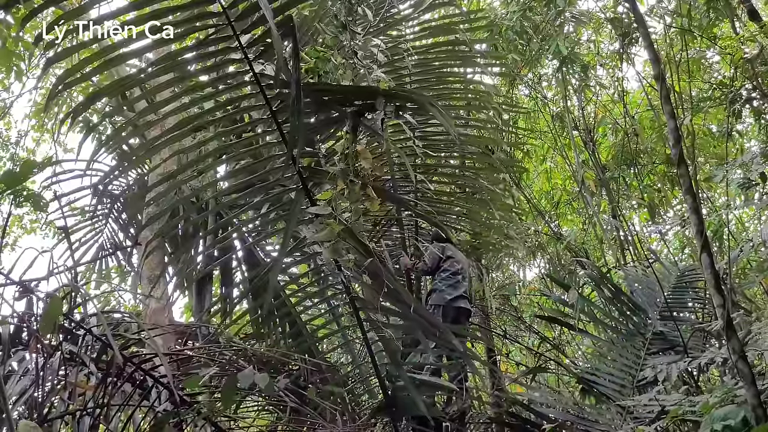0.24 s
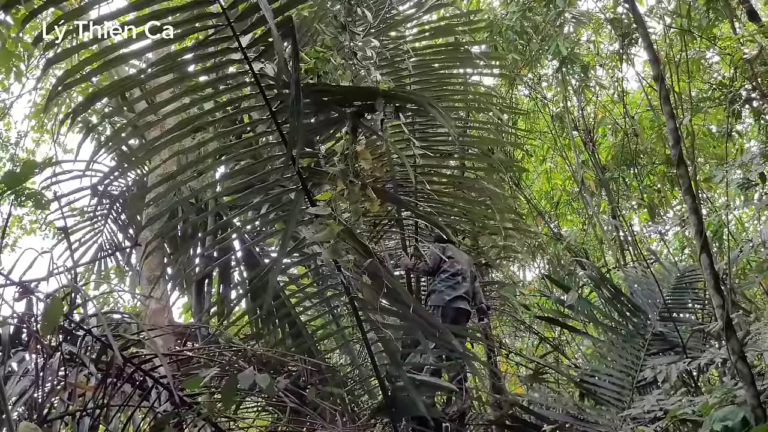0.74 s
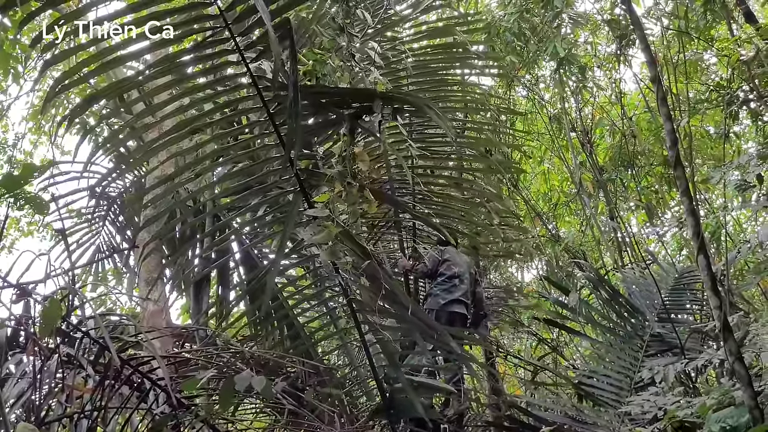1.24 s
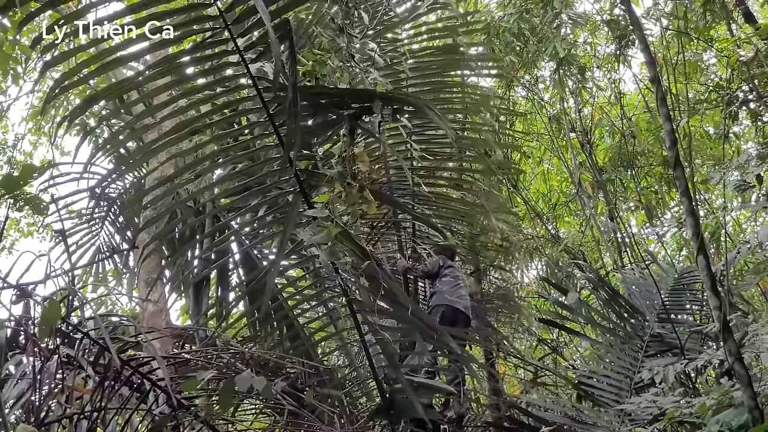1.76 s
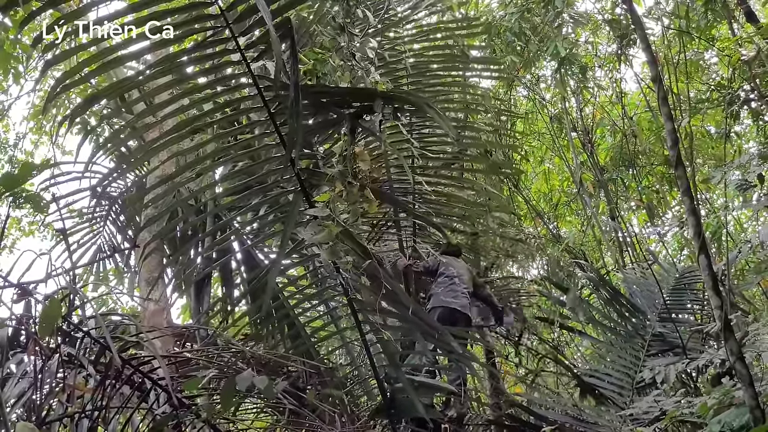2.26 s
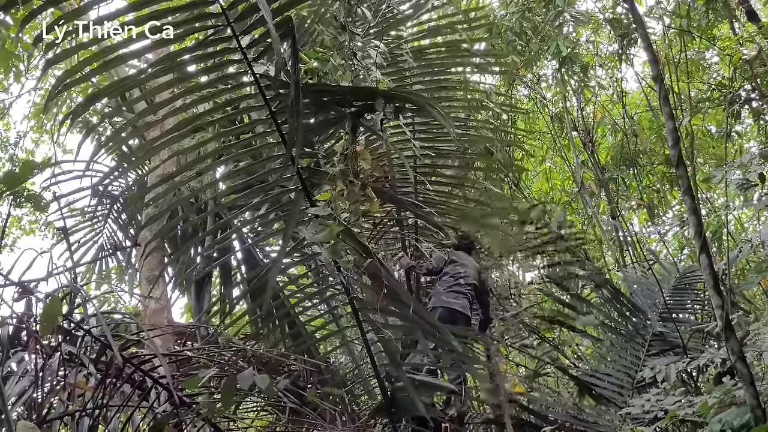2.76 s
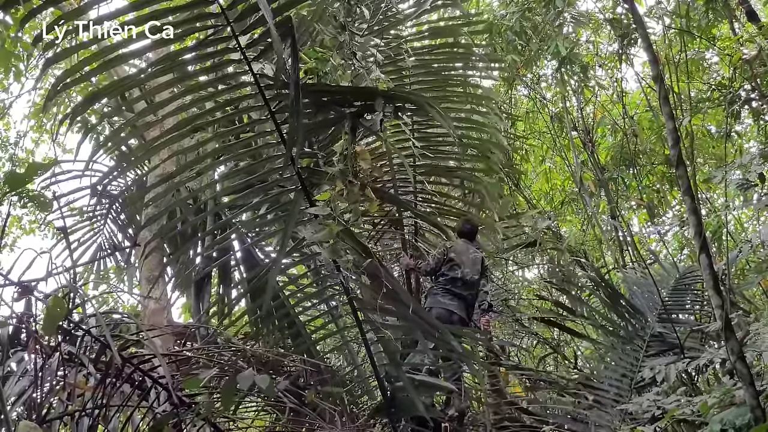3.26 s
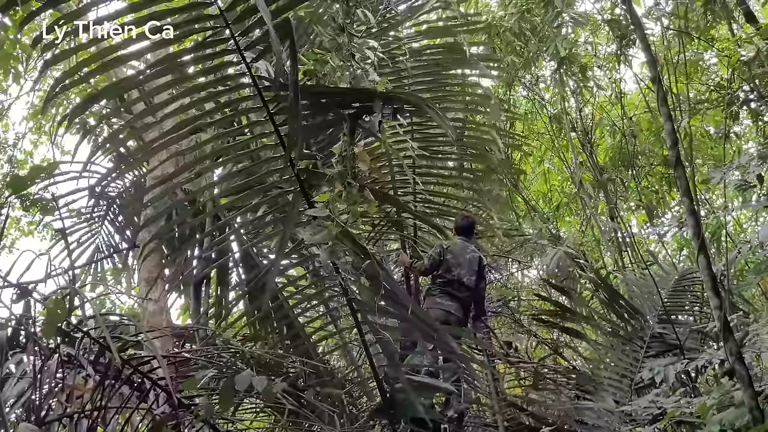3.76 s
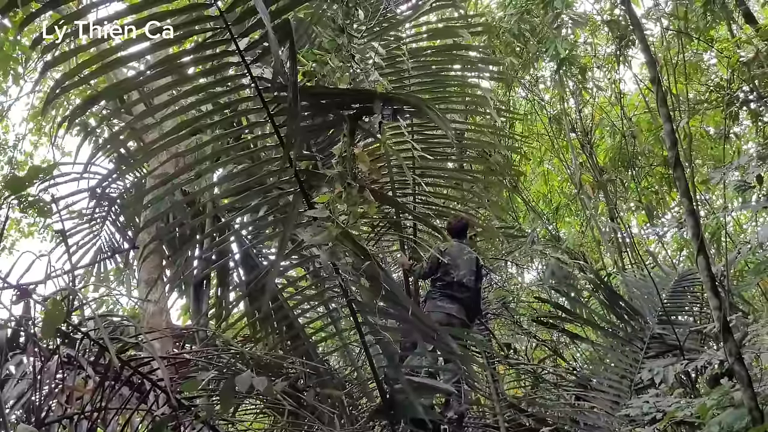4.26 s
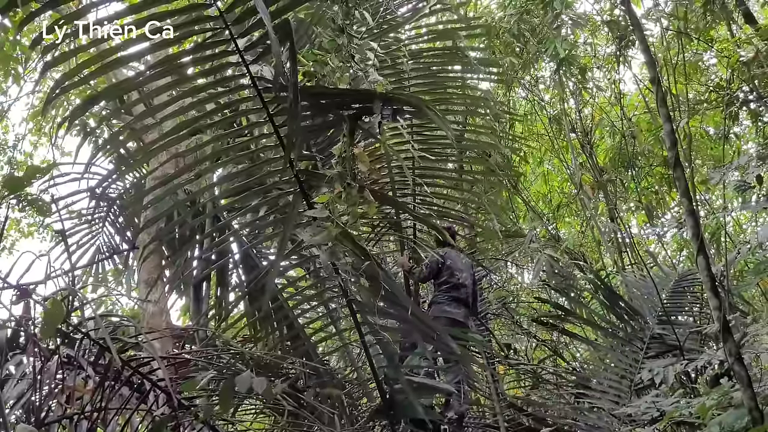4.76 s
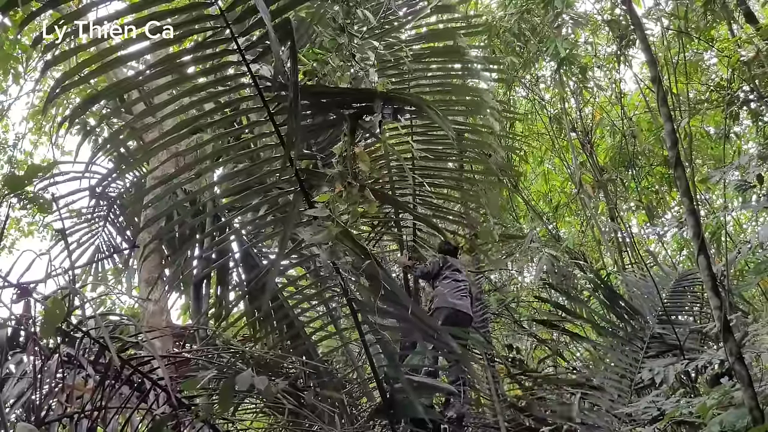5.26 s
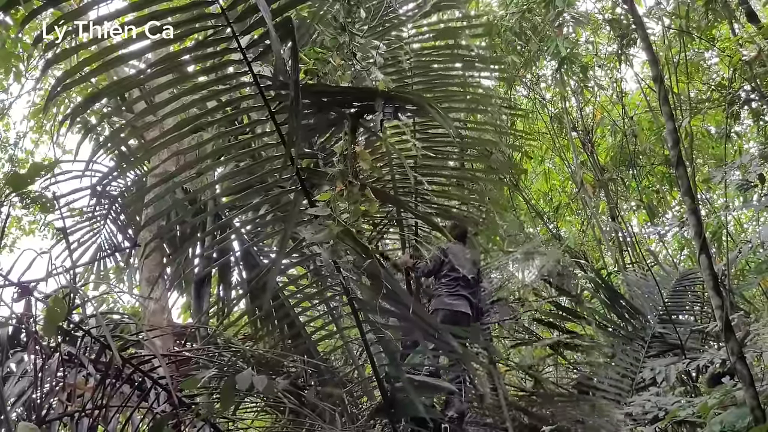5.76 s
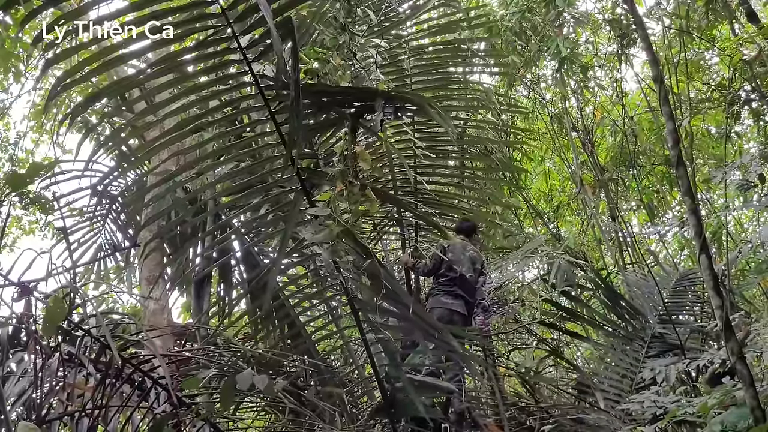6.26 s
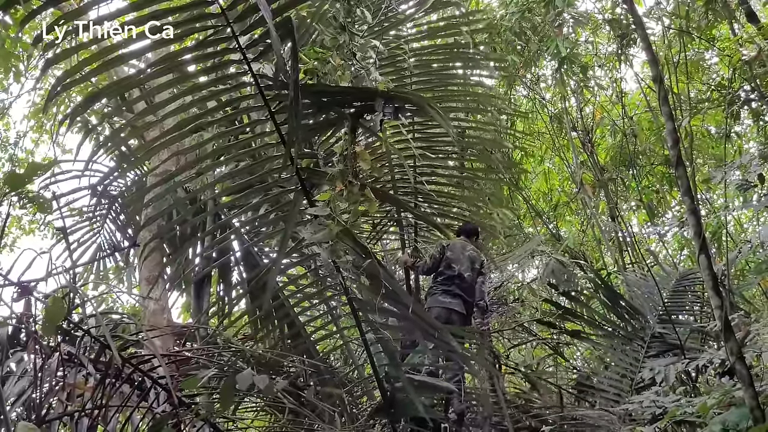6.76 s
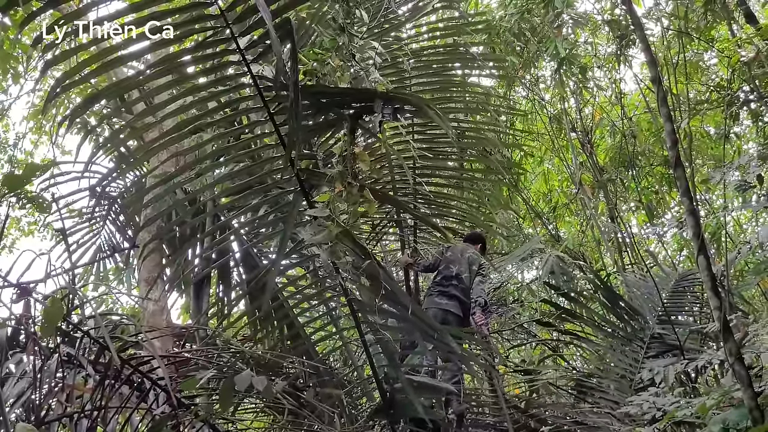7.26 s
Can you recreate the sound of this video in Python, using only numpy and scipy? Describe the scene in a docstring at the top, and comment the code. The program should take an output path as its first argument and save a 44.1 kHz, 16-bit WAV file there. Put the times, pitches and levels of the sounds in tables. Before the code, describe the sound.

A steady, fluttering insect hiss around 8-9 kHz, with fainter lower bands, runs throughout; a nearer call climbs and breaks off at about 0, 1.15, 2.85, 5.0 and 7.5 s. Leaves rustle at the start, a stalk snaps and knocks at 0.2 s, then faint scraping and small knocks follow. The first machete chop lands at 1.56 s, with a leafy shake. A tiny bird-like chirp at 2.2 s precedes a bright crack at 2.7. Firm crunchy blows hit at 2.8, 3.5, 4.2, 4.9 and 5.55 s; a very faint squeak comes near 4.0. Snaps and woody knocks crowd 5.2-6.3 s amid tugging rustle. Softer blows fall at 6.4 and 7.4 s. Blows are dry, hollow and low-mid, with short tearing fibres, little bass and diffuse forest echoes under half a second, heard slightly right in stereo.

```python
"""Insects hiss high up while stalks rustle and snap; then a man's machete blows cut fronds off a palm.
Each blow drives the damped modes of a stalk, with shaped noise for torn fibres and shaken leaflets.
Snaps are short noise bursts, knocks and bumps are struck modes, and pulls are swelling noise.
The insects are narrow bands of noise. A dense forest scatters the blows, snaps, knocks and gliding
tones through a decaying echo of noise."""
import sys
import numpy as np
from scipy import signal
from scipy.fft import rfft, irfft, next_fast_len
from scipy.io import wavfile
from scipy.ndimage import uniform_filter1d

SR = 44100
rng = np.random.default_rng(int(sys.argv[2]) if len(sys.argv) > 2 else 0)


def file_out(sig):
    """Save sig as 16-bit WAV at sys.argv[1]."""
    # one column per channel
    cols = np.atleast_2d(sig).T
    # limit, then scale
    lim = np.clip(cols, -1, 1)
    pcm = np.round(lim * 32767).astype(np.int16)
    wavfile.write(sys.argv[1], SR, pcm)


N = 331165
TIME = np.arange(N) / SR
HIT = TIME[:SR // 2]   # half a second, the clock of one short event

# Spectrum of tearing stalk fibres. Each row: frequency in Hz, relative spectral level in dB.
CRUNCH_SPECTRUM = [(150, -29), (400, 1), (700, -6), (950, -3), (1450, -4), (2100, -5.5), (3000, -9),
                   (5000, -7.5), (9000, -17), (16000, -15.5)]
# Unevenness of fibre clicks: spread between clicks in dB, spread between clumps in dB.
FIBRE_UNEVENNESS = (4.0, 2.0)
# Unevenness of leaf clicks and leaf echoes: spread between clicks in dB, spread between clumps in dB.
LEAF_UNEVENNESS = (3.5, 1.2)


def from_db(db):
    """A level in decibels is 20 times the base-10 logarithm of the amplitude gain returned here."""
    return 10 ** (np.asarray(db) / 20)


def rms_one(x):
    """Dividing by the root mean square gives a signal unit power."""
    return x / np.sqrt(np.mean(x ** 2) + 1e-20)


def at_hz(points, hz):
    """Columns against frequency are interpolated along a logarithmic axis, as pitch is heard."""
    f, *columns = np.transpose(points)
    return [np.interp(np.log(hz + 1), np.log(f), column) for column in columns]


def add(out, s, sound):
    """Superposition: a sound starting at s seconds sums with what is already there."""
    i = max(round(s * SR), 0)
    out[:, i:i + sound.shape[-1]] += sound[..., :N - i]


def colour(pair, spectrum):
    """Mid-side mixing of two independent signals sets their left-right correlation by frequency; rms 1."""
    # Each row: frequency in Hz, left-right correlation without unit.
    likeness = [(50, 0.85), (130, 0.91), (300, 0.91), (600, 0.88), (1100, 0.63), (2200, 0), (16000, 0.036)]
    length = pair.shape[1]
    size = next_fast_len(length)
    hz = np.arange(size // 2 + 1) * SR / size
    mid, side = rfft(pair, size) * from_db(at_hz(spectrum, hz)[0])
    alike = np.clip(at_hz(likeness, hz)[0], -1, 1)
    stereo = np.sqrt(1 + alike) * mid + np.sqrt(1 - alike) * side * [[1], [-1]]
    return rms_one(irfft(stereo, size)[:, :length])


def drift(rate, size):
    """Slow modulation: random knots of unit spread, rate per second, are joined by straight lines."""
    knots = rng.standard_normal(size)
    return np.interp(np.arange(size) * rate / SR, np.arange(size), knots)


def crackle(spectrum, size, grain_db, clump_db):
    """Countless clicks sum to noise, whose level fluctuates between clicks and between clumps; rms 1."""
    unevenness_db = grain_db * drift(3000, size) + clump_db * drift(250, size)
    clicks = rng.standard_normal((2, size)) * from_db(unevenness_db)
    return colour(clicks, spectrum)


def burst(rise, t60):
    """Energy builds up to gain 1 in rise seconds, then decays exponentially by 60 dB in t60 seconds."""
    growth = np.minimum(HIT / rise, 1) ** 2
    return growth * from_db(-60 * np.maximum(HIT - rise, 0) / t60)


def swell(s, rise, fall):
    """Exponential growth to gain 1 at s seconds, then decay, each at its own rate in dB per second."""
    return from_db(np.minimum((TIME - s) * rise, (s - TIME) * fall))


def ring(force, hz, t60):
    """A driven damped oscillator: one mode, a pair of complex poles, rings after each force on it."""
    r, w = from_db(-60 / (t60 * SR)), 2 * np.pi * hz / SR
    return signal.lfilter([0, np.sin(w)], [1, -2 * r * np.cos(w), r * r], force + 1e-18)


def resonance(x, hz, width_hz):
    """A resonator passes the band around its own frequency, with gain 1 at the peak."""
    r = np.exp(-np.pi * width_hz / SR)
    feedback = [1, -2 * r * np.cos(2 * np.pi * hz / SR), r * r]
    return signal.lfilter(np.array([1, 0, -1]) * (1 - r * r) / 2, feedback, x)


def buzz(hz, width_hz):
    """Many incoherent callers sum to narrow-band noise: a random envelope on a carrier; rms 1."""
    r = np.exp(-np.pi * 1.5 * width_hz / SR)   # two poles in series narrow the band; 1.5 makes up for it
    noise = rng.standard_normal((2, N)) + 1j * rng.standard_normal((2, N))
    flutter = signal.lfilter([1], [1, -2 * r, r * r], noise)
    carrier = np.exp(2j * np.pi * np.cumsum(hz * np.ones(N)) / SR)
    return rms_one((flutter * carrier).real)


def chops(crunch_db=3, shake_db=-2, trunk_db=-45.0, trunk_hz=58, touch=0.43, slip=0.028,
          split=0.63, split_width_hz=300, crunch_t60=0.076, shake_rise=0.0023, shake_t60=0.41):
    """Impact excitation: touch, bite and rough slip drive the stalk; fibres, leaflets and trunk respond."""
    # Blade blows. Each row: start in seconds, thud level in dB, frequency in Hz that the struck spot
    # favours (before tuning), stalk tuning ratio, crunch level in dB before crunch_db, split resonance in Hz,
    # leaflet shake level in dB before shake_db, decay time of the rough force in seconds per 60 dB.
    blows = [(1.562, -26, 224, 0.97, -26, 1160, -26, 0.17),
             (2.793, -21.5, 327, 1.0, -23.5, 1910, -32.5, 0.094),
             (3.490, -22, 325, 1.05, -24, 1170, -32.5, 0.068),
             (4.190, -23.5, 300, 1.065, -24.5, 1370, -27, 0.1),
             (4.885, -23, 378, 1.09, -26.5, 1580, -27, 0.063),
             (5.548, -20, 270, 1.108, -24, 1440, -31, 0.071),
             (6.393, -28, 297, 0.92, -25.5, 1230, -29.5, 0.12),
             (7.374, -30, 384, 1.07, -31, 940, -29.5, 0.4)]
    # Spectra of leaflets and trunk. Each row: frequency in Hz, relative spectral level in dB.
    leaflet_spectrum = [(400, 10), (1200, -2), (2500, 7), (3600, 0), (5200, 5.5), (6800, -3), (8500, 1.5),
                        (12000, -4), (16000, -22)]
    trunk_spectrum = [(20, -24), (40, -8), (58, 1), (85, -11), (140, -4), (250, -3), (600, -40),
                      (2000, -70)]
    bite_s = 0.00653   # from the blade's first touch to its full bite
    out = np.zeros((2, N))
    for s, thud, favoured_hz, tuning, crunch, split_hz, shake, shudder in blows:
        force = slip * rng.standard_normal(len(HIT)) * burst(bite_s, shudder)
        force[0] += touch
        force[round(bite_s * SR)] += 1
        body = from_db(thud) * stalk(force, favoured_hz, tuning)

        boom = np.sin(2 * np.pi * trunk_hz * HIT) * burst(0.048, 0.15)
        rumble = crackle(trunk_spectrum, len(HIT), 0, 0)[0] * burst(0.041, 0.19)
        trunk = from_db(trunk_db) * (boom + rumble)

        fibres = crackle(CRUNCH_SPECTRUM, len(HIT), *FIBRE_UNEVENNESS)
        fibres = rms_one(fibres + split * resonance(fibres, split_hz, split_width_hz))   # opening split rings
        fibres = from_db(crunch + crunch_db) * fibres * burst(bite_s, crunch_t60)

        leaves = crackle(leaflet_spectrum, len(HIT), *LEAF_UNEVENNESS) * burst(shake_rise, shake_t60)
        leaves = from_db(shake + shake_db) * leaves
        add(out, s, body + trunk + fibres + leaves)
    return out


def stalk(force, favoured_hz, tuning, spread=0.83, far_db=-7):
    """Modal superposition: the struck spot favours modes near one pitch; rms 1 over the loudest 10 ms."""
    # Modes of a frond stalk. Each row: frequency in Hz before tuning, level in dB before the weighting
    # by struck spot and a random change, decay time in seconds per 60 dB.
    modes = [(144.4, -8.5, 0.062), (237.5, -0.5, 0.086), (290.6, 1, 0.035), (381, 0.5, 0.045),
             (497, -4.5, 0.044), (553, -1, 0.024), (681, -1, 0.032), (895, -4, 0.056), (1280, 2.5, 0.0099),
             (1440, -1, 0.022)]
    body = 0
    for k, (hz, db, t60) in enumerate(modes):
        octaves = np.log2(hz / favoured_hz)
        away = 1 - np.exp(-(octaves / spread) ** 2)
        gain = from_db(db + far_db * away + rng.normal())
        body = body + ring(force, hz * tuning, t60) * gain * (-1) ** k   # neighbours in opposite phase
    return body / np.sqrt(uniform_filter1d(body ** 2, size=SR // 100).max())


def snaps(woody_db=-2, splinter_db=-1, fine_db=-1):
    """Sudden fracture: a bundle of fibres gives way in milliseconds, then the last strands crackle out."""
    # Snapping bundles. Each row: start in seconds, overall level in dB, then levels in dB relative to it,
    # before the function's own offsets, of the woody, splinter and fine treble parts, and
    # decay time in seconds per 60 dB.
    bundles = [(.206, -30.5, -2, -0.5, -0.5, 0.066), (.448, -42.5, -6, 0.5, 0, 0.13),
               (2.155, -43.5, -24, -20, 8.5, 0.065), (2.623, -34.5, -17, -2, 3, 0.094),
               (2.706, -20, -22, -6, 4, .062), (3.218, -33, -3, 1, 3, 0.093),
               (4.022, -42.5, -1.5, -5, 2.5, 0.14), (5.176, -31.5, 4, -20, -12, 0.064),
               (5.229, -34.5, -.5, 3, -1.5, 0.07), (5.395, -29, -3.5, -0.5, 1.5, 0.048),
               (5.459, -27.5, 3.5, 5, -5.5, 0.097), (5.811, -28.5, 2.5, -6.5, -5, 0.025),
               (6.333, -33.5, 3.5, -12, -23, 0.15)]
    # Spectra of splinters and fine strands. Each row: frequency in Hz, relative spectral level in dB.
    splinter_spectrum = [(600, -58), (1800, 0), (3200, -3.5), (4500, 2.5), (5400, 3), (6800, -15),
                         (9000, -15), (16000, -25)]
    fine_spectrum = [(3000, -22), (5500, -3), (7500, -6.5), (10000, -6), (12500, -3), (16000, -8)]
    out = np.zeros((2, N))
    for s, db, woody, splinter, fine, t60 in bundles:
        parts = [(CRUNCH_SPECTRUM, woody + woody_db),
                 (splinter_spectrum, splinter + splinter_db),
                 (fine_spectrum, fine + fine_db)]
        crack = 0
        for spectrum, part_db in parts:
            crack = crack + from_db(db + part_db) * crackle(spectrum, len(HIT), *FIBRE_UNEVENNESS)
        add(out, s, crack * burst(0.0034, t60))
    return out


def knocks(level_db=-3):
    """Impulsive contact: a light blow and a little roughness make the stalk's modes ring."""
    # Knocks of stalk on stalk. Each row: start in seconds, level in dB before level_db,
    # frequency in Hz that the contact favours (before tuning).
    contacts = [(.206, -32, 570), (.813, -48, 340), (1.084, -39, 590), (1.295, -42.5, 700),
                (3.044, -43, 280), (5.176, -27.5, 674), (5.177, -30, 339), (5.397, -33.5, 725),
                (5.627, -28.5, 448), (5.881, -37, 494), (6.115, -35.5, 696), (6.199, -35.5, 530),
                (6.265, -38.5, 645), (6.334, -31, 313), (6.707, -43.5, 380)]
    out = np.zeros((2, N))
    for s, db, favoured_hz in contacts:
        force = 0.066 * rng.standard_normal(len(HIT)) * burst(0.0015, 0.033)
        force[0] += 1
        add(out, s, from_db(db + level_db) * stalk(force, favoured_hz, 0.95, spread=0.29, far_db=-15.5))
    return out


def dragging(rustle_db=2, bump_db=-8):
    """Friction noise: stalks scrape and bump, and dry leaflets brush past, catching and letting go."""
    # Spectra of scraping stalks and rustling leaves. Each row: frequency in Hz, relative spectral level in dB.
    scrape_spectrum = [(30, -41), (100, -8.5), (180, -13), (280, 3.5), (500, 0.5), (900, -1), (1400, 0.5),
                       (2200, -1.5), (4000, -12.5), (9000, -47)]
    rustle_spectrum = [(500, -17), (1800, -6), (3000, -3), (3900, -3.5), (5000, 1), (6300, -8), (8000, 1),
                       (11000, -6.5), (13000, -6.5), (16000, -16.5)]
    scrape, rustle = pulling()
    catching_db = 1.1 * drift(55, N)
    low = scrape * from_db(catching_db) * crackle(scrape_spectrum, N, *FIBRE_UNEVENNESS)
    high = crackle(rustle_spectrum, N, grain_db=0.0, clump_db=0.2)
    high = rustle * from_db(rustle_db + 0.5 * catching_db) * high
    return low + high + scrape * from_db(bump_db) * bumps()


def pulling(range_db=20):
    """Incoherent sources add in power: each pull's scrape and rustle gains rise above stirring foliage."""
    # Pulls on a frond. Each row: time of the hardest tug in seconds, stalk scrape level in dB,
    # leaf rustle level in dB before the rustle offset, build-up in seconds, letting-go in seconds
    # (each the time for a change of range_db).
    tugs = [(.01, -44, -36.5, 0.22, 0.22), (.5, -54, -47.5, 1.4, 1.4), (1.18, -42, -46.5, 0.31, 0.43),
            (2.22, -49.5, -42.5, 0.1, 0.59), (2.68, -46.5, -39.5, 1.02, 1.13),
            (3.1, -47.5, -54, 0.36, 0.58), (4.0, -52.5, -49.5, 1.0, 0.32), (4.55, -60.5, -50.5, 0.92, .8),
            (4.95, -44, -41.5, .15, 0.3), (5.57, -44, -37.5, 0.79, 0.3), (6.3, -43.5, -40.5, 1.4, 0.51),
            (7.5, -48.5, -39, .7, 0.17)]
    scrape, rustle = from_db(-61), from_db(-49.5)   # the foliage never quite stops stirring
    for s, scrape_db, rustle_db, build, release in tugs:
        effort = swell(s, range_db / build, range_db / release)
        scrape = np.hypot(scrape, from_db(scrape_db) * effort)
        rustle = np.hypot(rustle, from_db(rustle_db) * effort)
    return scrape, rustle


def bumps(per_s=45, low_hz=450, high_hz=1100, count=4):
    """Random impacts, a Poisson-like train, ring a few spots that each favour another pitch; rms 1."""
    out = 0
    for favoured_hz in np.geomspace(low_hz, high_hz, count):
        struck = rng.random(N) < per_s / count / SR
        force = struck * rng.uniform(0.6, 1, N)
        out = out + stalk(force, favoured_hz, 0.94, spread=0.31, far_db=-20)
    return rms_one(out)


def glides():
    """Frequency glide: narrow-band tones, a far bird and a squeaking stalk, swell, slide and fade."""
    # Each row: start in seconds, length in seconds, level in dB, start frequency in Hz,
    # end frequency in Hz, bandwidth in Hz.
    tones = [(2.213, 0.092, -46, 7520, 6980, 340), (3.965, .125, -53, 511, 699, 9)]
    out = 0
    for s, length, db, start_hz, end_hz, width_hz in tones:
        phase = np.clip((TIME - s) / length, 0, 1)
        hz = start_hz + (end_hz - start_hz) * phase
        out = out + from_db(db) * np.sin(np.pi * phase) * buzz(hz, width_hz)
    return out


def caller(start_hz=8120, top_hz=9920, climb_s=0.32, width_hz=850):
    """Joint amplitude and frequency modulation: a near insect's call swells, climbs and breaks off."""
    # Calls. Each row: time of the climax in seconds, level in dB.
    calls = [(0.019, -35), (1.15, -48.5), (2.85, -37.5), (5.02, -35), (7.51, -34.5)]
    # rise and fall in dB per second
    gains = np.array([from_db(db) * swell(s, 36, 149.5) for s, db in calls])
    climax = np.array(calls)[gains.argmax(axis=0), 0]   # of the call that is strongest at each moment
    climb = np.exp(np.minimum(TIME - climax, 0) / climb_s)   # ever faster towards the climax
    return gains.max(axis=0) * buzz(start_hz + (top_hz - start_hz) * climb, width_hz)


def insects(throb_hz=34, throb_depth=0.28):
    """Amplitude modulation: a chorus throbs together as its bands wax and wane, beside a near caller."""
    # Steady insect groups. Each row: frequency in Hz, bandwidth in Hz, mean level in dB.
    groups = [(2590, 143, -53.5), (3147, 700, -57.5), (8100, 660, -48.5), (8590, 640, -52.5),
              (8795, 1870, -47)]
    chorus = 0
    for hz, width_hz, db in groups:
        waver_db = 1.3 * drift(12, N)
        chorus = chorus + from_db(db + waver_db) * buzz(hz, width_hz)
    rate_hz = throb_hz * (1 + 0.25 * drift(8, N))
    pulsing = 1 + throb_depth * np.sin(2 * np.pi * np.cumsum(rate_hz) / SR)
    return pulsing * chorus + caller()


def forest(x, wet_db=-2, onset=0.002, far_db=-23, far_t60=1.9):
    """Multiple scattering: trunks and leaves return dense echoes that die band by band, with a faint tail."""
    # Each row: frequency in Hz, decay time in seconds per 60 dB, scatter level in dB before wet_db.
    scatter_decay = [(60, 0.52, -10), (256, 0.28, -4.5), (785, 0.29, -3), (2040, 0.37, 3),
                     (4760, 0.35, 4.5), (15000, 0.27, 7.5)]
    t, echoes = TIME[:SR], 0
    flat = [(20, 0), (20000, 0)]
    scatter = [crackle(flat, SR, *LEAF_UNEVENNESS) for _ in range(2)]
    for k, low in enumerate(40 * 2 ** np.arange(9)):   # octave bands, taken from the two noises in turn
        octave = signal.butter(2, [low, 2 * low], "band", fs=SR, output="sos")
        band = signal.sosfilt(octave, scatter[k % 2])
        t60, db = at_hz(scatter_decay, low * np.sqrt(2))
        near = from_db(-60 * t / t60)
        far = from_db(far_db - 60 * t / far_t60)
        fall = np.minimum(t / onset, 1) * (near + far)
        echoes = echoes + from_db(db + wet_db) * band * fall / np.sqrt(np.sum(fall ** 2))
    return x + signal.fftconvolve(x, echoes, axes=1)[:, :N]


def from_the_right(x, lag=0.00012):
    """Interaural-type time difference: sound from the right reaches the left port lag seconds later."""
    left = np.roll(x[0], round(lag * SR)) * (TIME >= lag)
    return np.array([left, x[1]])


def scene(snap_direct=0.15):
    """Superposition of scattered blows, direct dragging and insects; snaps gain an extra direct share."""
    cracks = snaps()
    scattered = forest(chops() + cracks + knocks() + glides())
    work = scattered + snap_direct * cracks + dragging()
    return from_the_right(work) + insects()


def record(dry, cutoff_hz=16100):
    """Linear filtering: two microphone ports colour their sides; deep bass and extreme treble are cut."""
    # Each row: frequency in Hz, left minus right level in dB.
    port_difference = [(60, -3.5), (200, 1), (600, -1), (1200, -1.3), (2200, -0.5), (4400, -1), (6000, -5),
                       (8000, 2), (12000, 2.3), (16000, 1.5)]
    size = next_fast_len(N + SR // 10)
    hz = np.arange(size // 2 + 1) * SR / size
    ports = from_db(at_hz(port_difference, hz)[0] * np.array([[0.5], [-0.5]]))   # half to each side
    dry = signal.sosfilt(signal.butter(2, 42, "high", fs=SR, output="sos"), dry)
    top = 1 / np.sqrt(1 + (hz / cutoff_hz) ** 200)   # a very steep low-pass
    return irfft(rfft(dry, size) * ports * top, size)[:, :N]


dry = scene()
out = record(dry)
file_out(out)
```